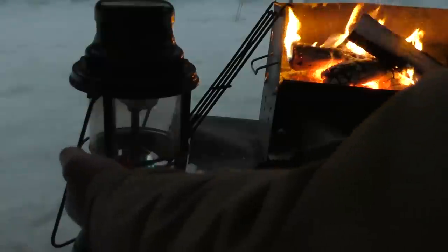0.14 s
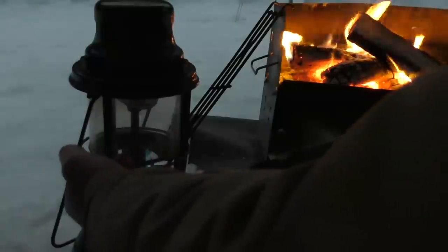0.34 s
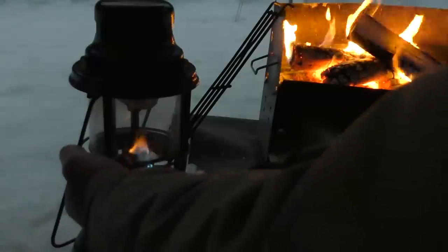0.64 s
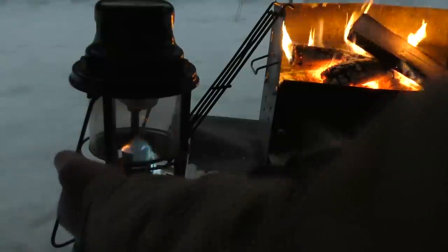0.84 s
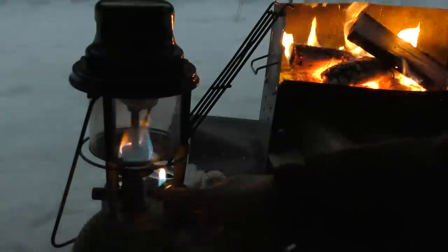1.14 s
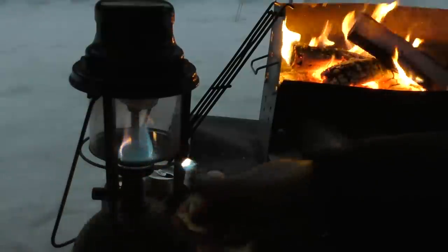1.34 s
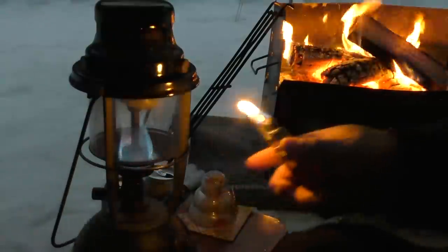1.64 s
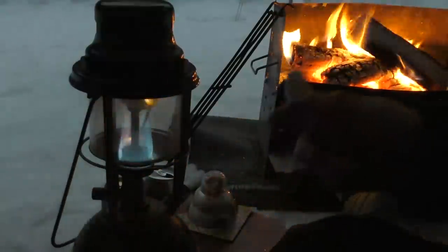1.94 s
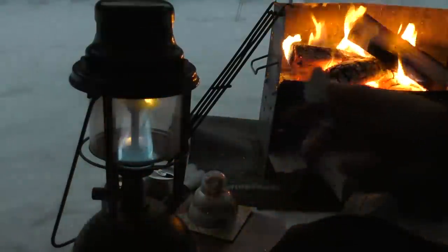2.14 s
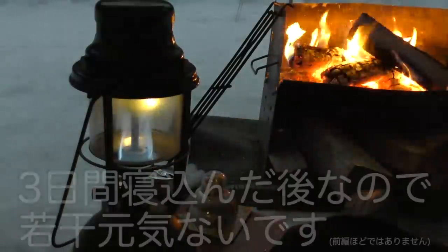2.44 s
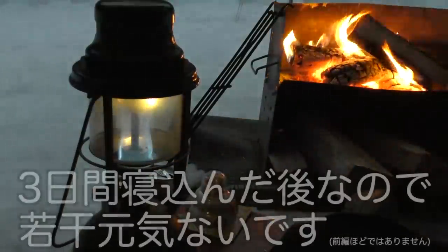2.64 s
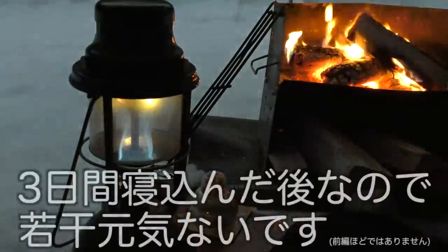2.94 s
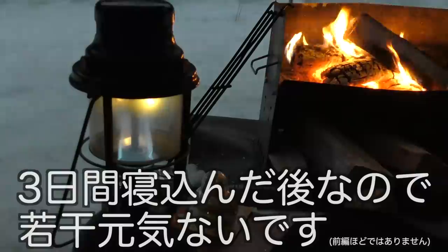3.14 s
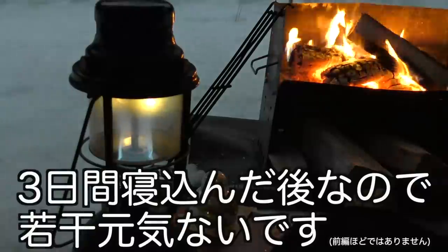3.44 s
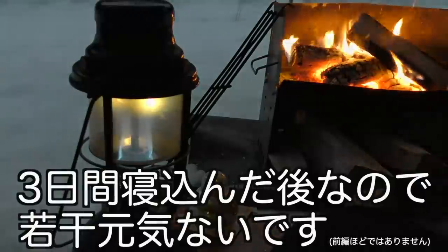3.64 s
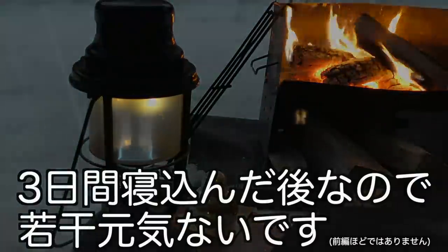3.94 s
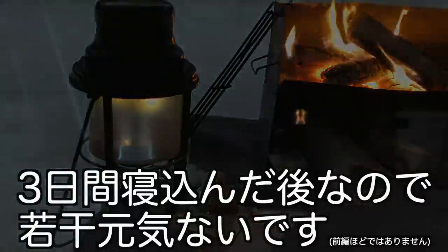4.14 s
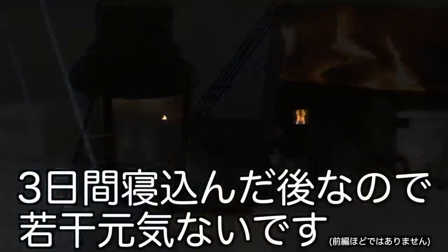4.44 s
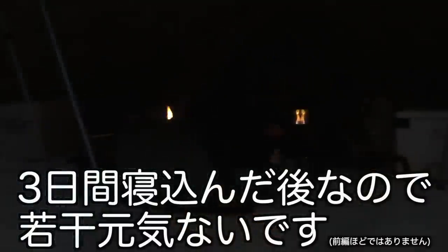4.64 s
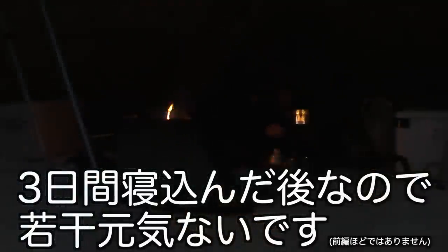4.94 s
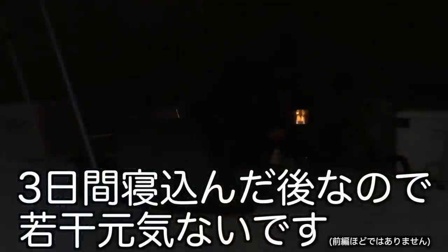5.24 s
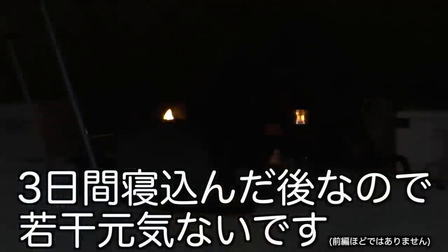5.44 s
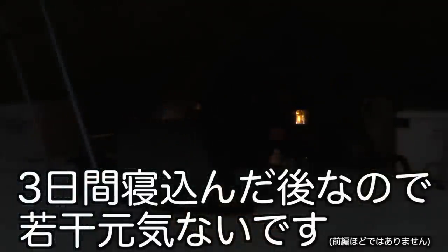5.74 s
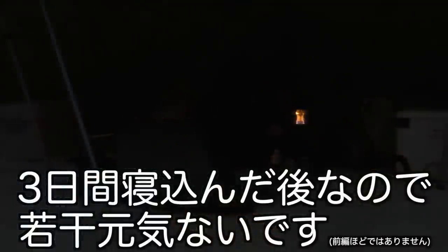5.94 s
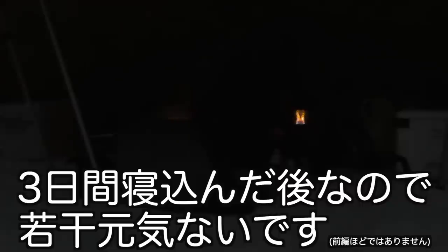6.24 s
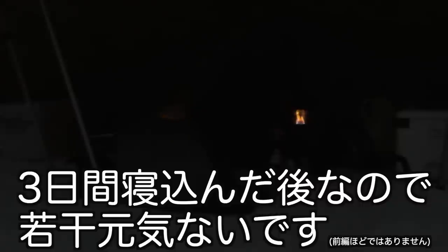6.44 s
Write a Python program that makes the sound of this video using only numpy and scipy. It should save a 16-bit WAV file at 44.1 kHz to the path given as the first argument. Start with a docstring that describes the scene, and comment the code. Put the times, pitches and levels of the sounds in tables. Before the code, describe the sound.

Close stereo pickup in open air, with a wide, faint outdoor hiss throughout. From the start a wood fire gives scattered bright ticks and soft low thumps. At about 0.8 s a gas torch begins, a turbulent hiss growing louder and brighter for a second. Around 1.86 s its trigger releases with a small click, then snaps at 1.88 s, extremely loud and sharp, with a brief metallic ring; the background ducks and slowly recovers. From 2.3 to 4 s sleeves rustle in soft swishes, with fire ticks, thumps, a faint scrape and a light metal tap near 3.5 s. Small knocks precede six pump strokes at about 4.2, 4.67, 5.11, 5.54, 5.98 and 6.42 s: rapid low gulps, wet spits, rasping friction, dull stop and clatter, strongest on the fifth. Softer return slides and thin rod pings fall between, the brightest at 5.7 s.

```python
"""Pressure lantern at a campsite

Dusk, close stereo microphone: a gas torch, a turbulent hiss, lights a pressure lantern and snaps shut.
Sleeves rustle as slipping fibres; a wood fire ticks with short pitched bursts and thumps softly.
Then six pump strokes: air gulps through the check valve into the tank, the plunger rasps and knocks in
its barrel over ringing metal modes, and the loose rod pings. A faint outdoor hiss lies under it all."""
import sys
import numpy as np
from scipy import signal
from scipy.fft import rfft, irfft
from scipy.io import wavfile
from scipy.ndimage import uniform_filter1d, map_coordinates

SR = 44100
rng = np.random.default_rng(int(sys.argv[2]) if len(sys.argv) > 2 else 0)


def bounce(signal):
    """Save signal as a 16-bit WAV file at the path given by the first command-line argument."""
    frames = np.transpose(np.atleast_2d(signal))
    limited = np.clip(frames, -1, 1)
    pcm = np.round(limited * 32767).astype(np.int16)
    wavfile.write(sys.argv[1], SR, pcm)


N = 290619
TIME = np.arange(N) / SR
RING = TIME[:SR // 4]  # time axis of one short sound

# All levels below are nominal: trims inside the functions and the limiter still follow.
# outdoor hiss: (frequency [Hz], gain [dB])
OUTDOORS_SPECTRUM = [(15, -49), (25, -12), (195, 0.5), (326, -3), (476, -7), (575, -16.5), (695, -8),
                     (775, -10), (936, -4), (1890, -3.5), (2910, -7), (6050, -21), (12200, -18),
                     (14800, -18.5), (16000, -25)]
AIR_DB, AIR_DRIFT_DB_PER_S = -47, -0.3563  # the drift also applies to the flames

# ticks of the embers: (time [s], level [dB], pitch [Hz], ring relative to tick [dB])
EMBERS = [(0.1698, -27, 13000, -6), (0.2995, -41, 8250, -10), (0.3397, -30, 8700, -3),
          (0.5715, -26.5, 8240, -3.5), (1.417, -24, 12000, -2), (2.3145, -43, 10200, -5),
          (2.7256, -32, 8500, -3), (3.009, -36.5, 9000, -5), (3.572, -34.5, 11100, -2),
          (3.6363, -32, 13800, -10), (4.0155, -26, 7000, -23)]
# soft low thumps, like flaps of the fire: (time [s], level [dB], starting pitch [Hz])
THUMPS = [(0.025, -47, 170), (0.264, -50, 145), (0.522, -44, 170), (0.7, -38, 336), (0.729, -36, 153),
          (2.219, -39.5, 168), (2.38, -38, 234), (2.537, -41.5, 242), (2.651, -38, 226), (2.852, -41, 223),
          (3.364, -39, 300), (3.66, -40, 244)]

# soft swishes of a sleeve, and one brief fizz near the start:
# (time of peak [s], rise [s], level [dB], treble [dB])
SWISHES = [(0.325, .03, -53, 3), (2.36, 0.21, -56, 3), (2.6, 0.068, -57.5, 6), (2.73, 0.066, -48.5, 8),
           (2.825, 0.045, -49.5, 9.5), (2.94, 0.2, -51.5, -5), (3.384, 0.076, -46.5, -1),
           (3.55, .1, -51, -8), (3.67, 0.069, -47.5, 0.5), (3.783, 0.067, -45.5, -3),
           (3.95, 0.17, -56, 0.5)]
SWISH_FALL_SHARE = 0.94  # fall time over rise time
# rustling cloth: (frequency [Hz], gain [dB])
CLOTH_SPECTRUM = [(59, -24), (100, -6.5), (315, -0.5), (524, -3.5), (583, -14), (801, -13), (1360, -2.5),
                  (1650, -6), (4570, -14.5), (6990, -19), (11200, -13.5), (14400, -18), (16000, -29)]
# a faint hollow scrape: (time of peak [s], rise [s], fall [s], level [dB], pitch [Hz])
SCRAPE = (2.9, .05, .08, -49, 1330)
# a light tap on metal: (time [s], level [dB], ring [Hz], t60 [s])
TAP = (3.478, -29, 4330, .06)

TORCH_ON_S, TORCH_OFF_S, TORCH_ATTACK_S, TORCH_RELEASE_S = 0.83, 1.836, 0.16, 0.16
TORCH_DB, TORCH_SWELL_DB_PER_S = -39.5, 11
TORCH_TREBLE_DB, TORCH_TREBLE_DB_PER_S = -9, 7.5
# gas jet: (frequency [Hz], gain [dB])
JET_SPECTRUM = [(59, -43), (100, -14.5), (244, -3), (289, -0.5), (461, -2.5), (595, -8.5), (648, -10),
                (836, -11.5), (1130, -3), (1680, -2.5), (2420, -4.5), (3700, -5), (6840, -11.5),
                (11900, -5), (16000, -16)]
# torch trigger lets go and snaps home: (time [s], level [dB], treble [dB], strongest ring [Hz], its t60 [s])
SNAPS = [(1.858, -24.5, -17, 2720, 0.049), (1.8796, 6.5, 7, 9900, 0.018), (1.8826, 2, -10, 2750, 0.0058)]
# crack of the trigger: (frequency [Hz], gain [dB])
TRIGGER_SPECTRUM = [(350, -54), (600, -39), (1410, -14.5), (1700, -10.5), (1960, -5.5), (2830, -12),
                    (3210, -11), (4340, -5), (4780, -12), (7110, -15), (10200, 0), (16000, -12)]
# torch body, before its overall damping: (frequency [Hz], level [dB], t60 [s])
TORCH_MODES = [(1670, 1, 0.033), (2600, -4, 0.0087), (4380, -14.5, 0.076), (6550, -8, 0.051),
               (9510, -2.5, 0.09), (12300, -8, 0.051), (14200, -10, 0.057)]

# lantern metal, before a random spread of levels: (frequency [Hz], level [dB], t60 [s])
LANTERN_MODES = [(988, -6.5, 0.036), (1333, -7.5, 0.038), (2240, -11.5, 0.18), (2920, -7, 0.14),
                 (3342, 5.5, 0.048), (4210, -2.5, 0.055), (4660, -0.5, 0.066), (4620, -24, 0.037),
                 (5440, -3, 0.064), (5910, -8.5, 0.14), (9000, -3, 0.072), (11080, 1, 0.023),
                 (10400, 0, 0.065)]
# dense ringing of the pump barrel: (frequency [Hz], gain [dB])
BARREL_SPECTRUM = [(410, -46.5), (700, -2.5), (808, -15), (958, 0.5), (1230, -5), (1330, -3), (1800, -6.5),
                   (1940, 0.5), (2660, -1.5), (3280, -3.5), (3600, -7), (4800, -7), (6650, -12),
                   (10800, -9), (16000, -21)]
# rod bumps sideways against the barrel as it is gripped and pushed: (time [s], level [dB], treble [dB])
KNOCKS = [(3.785, -32, 2), (3.812, -32.5, 2), (4.188, -33.5, 1), (4.22, -22.5, 12), (5.077, -32.5, -6),
          (5.125, -24, 1), (5.986, -20.5, 2), (6.434, -28, 0)]
KNOCK_CONTACT_S, KNOCK_HZ = 0.0048, 3300
# before each push the rod takes up its slack with a light knock and a ping: (time [s], level [dB])
SLACK = [(4.148, -39), (4.609, -43.5), (5.054, -35.5), (5.472, -32), (5.935, -29), (6.366, -32.5)]
SLACK_CONTACT_S, SLACK_HZ, SLACK_TREBLE_DB, SLACK_PING_DB = 0.0047, 3080, -4.5, -1
# plunger hits bottom dully, then clatters and rebounds:
# (time [s], knock level [dB], clatter delay [s], clatter level [dB], treble [dB])
STOPS = [(4.264, -14.5, 0.025, -24.5, 0.5), (4.696, -25, .012, -31, 3), (5.142, -39, .012, -21.5, 4),
         (5.594, -28, 0.025, -23.5, 9), (6.018, -12, .015, -10, 4), (6.465, -20, .012, -18.5, 0.5)]
STOP_CONTACT_S, STOP_HZ, STOP_TREBLE_DB = 0.0038, 1800, -3.5
CLATTER_CONTACT_S, CLATTER_HZ = 0.0084, 4220
REBOUND_S, REBOUND_DB = 0.046, -18
# how much the strongest ring stands out
STOP_FOCUS_DB, CLATTER_FOCUS_DB, LIGHT_FOCUS_DB = -2, -5, -8.5

# rod pings as it is drawn back: (time [s], level [dB])
PINGS = [(4.831, -41), (5.2614, -27.5), (5.7027, -14), (6.131, -30.5), (6.5824, -30.5)]
# loose rod, before its overall damping: (frequency [Hz], level [dB], t60 [s])
ROD_MODES = [(3260, -35, 0.071), (4260, -7, 0.062), (5230, -52, 0.086), (5820, -2.5, 0.046),
             (6589, -37, 0.076), (8046, 6, 0.062), (12310, -21, 0.072), (14320, -36, 0.095)]

# pump strokes: (time [s], length [s], valve openings [per s], gulp level [dB], gulp pitch [ratio],
# rasp level [dB], rasp fade [s], rasp treble [dB])
STROKES = [(4.203, 0.068, 74, -22.5, 1.09, -23, 0.033, -16),
           (4.673, 0.049, 71, -18, 1.03, -19.5, 0.024, -7.5),
           (5.112, 0.059, 82.5, -16.5, 1.06, -23, 0.046, -2.5),
           (5.537, 0.063, 87.4, -18, 1, -24.5, 0.041, -28), (5.981, 0.04, 105, -19.5, 0.84, -21, 0.038, 2),
           (6.424, 0.054, 104, -23, 0.91, -23, 0.025, -9)]
# after each push the plunger slides back, fastest RETURN_S after the stroke began
RETURN_S, RETURN_RISE_S, RETURN_FALL_S, RETURN_DB = 0.29, 0.12, 0.026, -52.5
RETURN_GLIDE = 0.11  # how strongly plunger speed shifts the pitch of the hiss
# hiss of the plunger sliding back: (frequency [Hz], gain [dB])
SLIDE_SPECTRUM = [(2060, -39), (3500, -4), (4310, 4), (4570, -32), (5570, -7), (6040, -6.5), (8260, 5),
                  (9770, -10), (14000, -26)]
# tank resonance: (frequency [Hz], gain [dB])
TANK_SPECTRUM = [(29, -78), (50, -31.5), (165, 2.5), (282, 7.5), (469, 2.5), (539, -6), (620, -42),
                 (721, -9.5), (800, -33), (1040, -29), (1760, -120)]

LIMIT_DB, RECOVER_DB_PER_S = -7.5, 30.5  # the recorder's limiter
TOP_HZ = 16100  # the recorder's upper limit


def undb(db):
    """Decibels to gain."""
    return 10 ** (np.asarray(db) / 20)


def unit(x):
    """Scale to rms 1."""
    return x / np.sqrt(np.mean(x ** 2) + 1e-20)


def crest(x):
    """Scale so that the loudest 2 ms have rms 1."""
    return x / np.sqrt(uniform_filter1d(x ** 2, size=88).max() + 1e-20)


def add(track, s, x):
    """Mix a sound into a track at time s."""
    i = max(int(s * SR), 0)
    track[i:i + len(x)] += x[:max(N - i, 0)]


def colour(x, spectrum):
    """Causal minimum-phase filter with the given (Hz, dB) outline."""
    size = 4096
    hz, db = np.transpose(spectrum)
    bins_hz = np.arange(size // 2 + 1) * SR / size
    gain = undb(np.interp(np.log(bins_hz + 1), np.log(hz), db))
    # folding the cepstrum onto positive times makes the filter causal
    cepstrum = irfft(np.log(gain))
    cepstrum[1:size // 2] *= 2
    cepstrum[size // 2 + 1:] = 0
    response = irfft(np.exp(rfft(cepstrum)))
    return signal.fftconvolve(x, response)[:len(x)]


def band(x, lo_hz, hi_hz):
    """Band-pass with second-order skirts."""
    edges_hz = [lo_hz, min(hi_hz, SR / 2 - 1)]
    return signal.sosfilt(signal.butter(2, edges_hz, "band", fs=SR, output="sos"), x)


def brighten(x, db, corner_hz=7500):
    """Raise or lower the treble."""
    low = signal.sosfiltfilt(signal.butter(2, corner_hz, fs=SR, output="sos"), x)
    return low + undb(db) * (x - low)


def fade(t60):
    """Exponential decay by 60 dB in t60 seconds."""
    return np.exp(-np.log(1000) * RING / t60)


def burst(t60):
    """Dying noise: many modes too close to tell apart."""
    return rng.standard_normal(len(RING)) * fade(t60)


def ring(modes):
    """Free vibration of a struck body: decaying sines of random polarity."""
    total = np.zeros(len(RING))
    for hz, db, t60 in modes:
        cycles = hz * RING + rng.integers(2) / 2
        total += undb(db) * fade(t60) * np.sin(2 * np.pi * cycles)
    return unit(total)


def wander(rate):
    """Random wander of rms 1, from smoothed steps drawn about rate times a second."""
    k = int(SR / rate)
    steps = np.repeat(rng.standard_normal(N // k + 1), k)
    return unit(uniform_filter1d(uniform_filter1d(steps, k), k)[:N])


def grains(per_s, spread_db):
    """Tiny slips at random times and of random size."""
    size = undb(spread_db * np.minimum(rng.exponential(size=N), 4))
    happens = rng.random(N) < per_s / SR
    return unit(happens * size * rng.choice([-1, 1], N))


def swell(s, rise_s, fall_s):
    """Smooth rise and fall of one movement, 1 at time s."""
    distance = (TIME - s) / np.where(TIME < s, rise_s, fall_s)
    return np.exp(-np.minimum(distance ** 2, 20))


def place(x, pan_db, side_db, t60=0.041):
    """Put a source before the stereo microphone; things nearby scatter a little of it sideways."""
    scatter = burst(t60)
    side = undb(side_db) * signal.fftconvolve(x, scatter / np.linalg.norm(scatter))[:N]
    # pan_db is the level of the first channel over the second
    return np.array([(x + side) * undb(pan_db / 2), (x - side) * undb(-pan_db / 2)])


def outdoors():
    """A wide, even hiss of filtered noise whose level wavers a little."""
    mid, side = (unit(colour(rng.standard_normal(N), OUTDOORS_SPECTRUM)) * undb(.5 * wander(11))
                 for _ in range(2))
    side = undb(-8.5) * brighten(side, 1.3, corner_hz=4000)
    return undb(AIR_DB + AIR_DRIFT_DB_PER_S * TIME) * np.array([mid + side, mid - side])


def fire(tick_db=-3, flutter_db=-61):
    """Gas pockets burst in the logs: sharp ticks with a brief pitch; flames flap in low puffs and thumps."""
    ticks = np.zeros(N)
    for s, db, hz, ring_db in EMBERS:
        tick = crest(band(burst(0.011) + undb(-9) * burst(0.066), hz / 2.4, 17000))
        tone = crest(band(burst(0.016), hz / 1.024, hz * 1.026))
        add(ticks, s, undb(db + tick_db) * crest(tick + undb(ring_db) * tone))

    puffs = grains(300, 2) * undb(3 * wander(14))
    low_puffs = unit(band(band(puffs, 71, 380), 71, 380))  # twice, for steeper skirts
    flutter = undb(flutter_db + AIR_DRIFT_DB_PER_S * TIME) * low_puffs

    thumps = np.zeros(N)
    for s, db, pitch_hz in THUMPS:
        # a few cycles that sink in pitch
        hz = pitch_hz * (.5 + .5 * fade(0.099))
        cycles = np.cumsum(hz) / SR
        add(thumps, s, undb(db) * crest(RING * fade(0.019) * np.sin(2 * np.pi * cycles)))
    flames = place(flutter, -0.44, -5.5) + place(thumps, -.5, -19)
    return place(ticks, -0.89, -17, t60=0.013) + flames


def handling(cloth_db=5.5, treble_db=-1, crinkle_db=-3):
    """Cloth fibres slip and crinkle in swishes and a brief fizz; hands scrape the gear and tap a metal part."""
    fibres = unit(colour(grains(5000, 1.6), CLOTH_SPECTRUM)) * undb(cloth_db + 2 * wander(35))
    crinkles = signal.oaconvolve(grains(260, 5.4), burst(0.019))[:N]
    fibres += undb(crinkle_db) * unit(band(crinkles, 1760, 4200))
    cloth = np.zeros(N)
    for s, rise_s, db, bright_db in SWISHES:
        movement = undb(db) * swell(s, rise_s, SWISH_FALL_SHARE * rise_s)
        cloth += movement * brighten(fibres, bright_db + treble_db)

    s, rise_s, fall_s, db, hz = SCRAPE
    scrape = undb(db) * swell(s, rise_s, fall_s) * unit(band(grains(1100, 4.7), hz / 1.2, hz * 1.05))

    tap = np.zeros(N)
    s, db, hz, t60 = TAP
    contact = crest(band(burst(0.015), 1100, 3000))
    add(tap, s, undb(db) * crest(crest(ring([(hz, 0, t60)])) + undb(7) * contact))
    return place(cloth + scrape, -2.8, -10) + place(tap, -.5, -19)


def torch(flicker_db=1.5):
    """A turbulent gas jet grows louder and brighter until the sprung trigger snaps shut."""
    burning_s = np.clip(TIME, TORCH_ON_S, TORCH_OFF_S) - TORCH_ON_S
    opening, closing = burning_s / TORCH_ATTACK_S, (TORCH_OFF_S - TIME) / TORCH_RELEASE_S
    flow = np.clip(np.minimum(opening, closing), 0, 1)
    jet_db = TORCH_DB + TORCH_SWELL_DB_PER_S * burning_s + flicker_db * wander(44.88)
    jet = unit(colour(grains(9000, 1.6), JET_SPECTRUM)) * undb(jet_db)
    jet = flow * brighten(jet, TORCH_TREBLE_DB + TORCH_TREBLE_DB_PER_S * burning_s, corner_hz=8500)

    snaps = np.zeros(N)
    for s, db, bright_db, hz, t60 in SNAPS:
        crack = unit(colour(burst(0.036) + undb(-14.0) * burst(0.094), TRIGGER_SPECTRUM))
        crack += undb(-7) * unit(ring(TORCH_MODES) * fade(0.11))
        spring = unit(band(burst(t60), hz / 1.06, hz * 1.06))
        add(snaps, s, undb(db) * crest(unit(brighten(crack, bright_db)) + undb(-5.5) * spring))
    return place(jet, -1.2, -11) + place(snaps, -1, -12.5, t60=0.0071)


def metal(modes_db=-6, t60=0.06, spot_db=3):
    """Response of the lantern to one tick; its mode levels differ with the spot that is touched."""
    click = unit(1. * (RING == 0))
    dense = unit(colour(unit(burst(t60)) + undb(0.5) * click, BARREL_SPECTRUM))
    modes = np.array(LANTERN_MODES, float)
    modes[:, 1] += spot_db * rng.standard_normal(len(modes))
    body = dense + undb(modes_db) * ring(modes)
    return body / np.linalg.norm(body)


def knock(db, contact_s, hz, treble_db, focus_db, lowest_hz=1050):
    """A brief chatter of contacts swells and dies, ringing the metal with emphasis near one pitch."""
    chatter = rng.standard_normal(len(RING)) * np.sqrt(RING) * np.exp(-RING / contact_s)
    clank = band(signal.fftconvolve(chatter, metal())[:len(RING)], lowest_hz, 17000)
    focus = unit(band(clank, hz / 1.45, hz * 1.28))
    return undb(db) * crest(unit(brighten(clank, treble_db)) + undb(focus_db) * focus)


def pump_knocks():
    """The rod takes up its slack, bumps the barrel on the way and drives the plunger against its stop."""
    out = np.zeros(N)
    for s, db in SLACK:
        add(out, s, knock(db, SLACK_CONTACT_S, SLACK_HZ, SLACK_TREBLE_DB, LIGHT_FOCUS_DB))
    for s, db, treble_db in KNOCKS:
        add(out, s, knock(db, KNOCK_CONTACT_S, KNOCK_HZ, treble_db, LIGHT_FOCUS_DB))
    for s, db, delay_s, clatter_db, treble_db in STOPS:
        add(out, s, knock(db, STOP_CONTACT_S, STOP_HZ, treble_db + STOP_TREBLE_DB, STOP_FOCUS_DB))
        for late_s, drop_db in ((0, 0), (REBOUND_S, REBOUND_DB)):
            clatter = knock(clatter_db + drop_db, CLATTER_CONTACT_S, CLATTER_HZ, treble_db, CLATTER_FOCUS_DB)
            add(out, s + delay_s + late_s, clatter)
    return place(out, -1.2, -19.5)


def rod(ping_db=-3, rattle_db=-11, tick_db=-2, bounce_s=.0045):
    """The loose rod rings briefly in its modes and rattles once in its cap."""
    out = np.zeros(N)
    slack_pings = [(s, db + SLACK_PING_DB) for s, db in SLACK]
    for s, db in PINGS + slack_pings:
        ping = crest(ring(ROD_MODES) * fade(0.45))
        tick = undb(tick_db) * crest(band(burst(0.0049), 8100, 8300))
        # the contact takes a moment to build, which keeps the attack round
        attack = np.minimum(RING / 0.00032, 1)
        add(out, s, undb(db + ping_db) * crest((ping + tick) * attack))
        add(out, s + bounce_s, undb(db + rattle_db) * crest(band(burst(0.027), 1600, 10640)))
    return place(out, -0.56, -19)


def plunger(rise_s=0.026, swell_db=5, shake_db=-6, stutter_db=4.0):
    """The leather cup rasps down the barrel, ringing the lantern's metal, and slides softly back."""
    rasp, push, pull = np.zeros(N), np.zeros(N), np.zeros(N)
    slips = grains(2200, 3.8) * undb(stutter_db * wander(170))
    for s, length, _, _, _, db, fade_s, treble_db in STROKES:
        # friction grows with the pressure, then dies away as the hand stops
        pressure = np.clip((TIME - s) / length, 0, 1)
        outside = np.maximum(s - TIME, 0) / rise_s + np.maximum(TIME - s - length, 0) / fade_s
        force_db = db + swell_db * (pressure - 1.5) - 8.2 * (TIME < s)
        force = undb(force_db) * np.exp(-np.minimum(outside, 20))
        rasp += signal.oaconvolve(force * slips, brighten(metal(), treble_db))[:N]
        push += force
        pull += swell(s + RETURN_S, RETURN_RISE_S, RETURN_FALL_S)
    # the push also shakes the tank
    shake = undb(shake_db) * push * unit(band(colour(grains(900, 5), TANK_SPECTRUM), 112, 1300))
    # the hiss of the return rises in pitch with the speed
    travel = np.cumsum(1 + RETURN_GLIDE * (pull - .8))
    slide = unit(map_coordinates(colour(grains(4000, 3.6), SLIDE_SPECTRUM), [travel], mode="mirror"))
    slide *= pull * undb(RETURN_DB + 2 * wander(40))
    return place(rasp + slide, -0.31, -18) + place(shake, -.4, -21)


def add_gulp(track, s, db, pitch):
    """One gulp of air into the tank; a smaller bubble sounds higher."""
    shape = colour(1. * (RING == 0), TANK_SPECTRUM)
    add(track, s, undb(db) * crest(np.interp(RING * pitch, RING, shape)))


def valve(echo_s=0.00605, echo_db=-10, spit_db=-12, spit_t60=0.075, squeak_db=-15, squeak_hz=9300, sag_db=3):
    """Air enters the tank in quick gulps, each with a rebound, a wet spit and a tiny squeak of the valve."""
    gulps, spits = np.zeros(N), np.zeros(N)
    for s, length, rate, db, tone, *_ in STROKES:
        chances = rng.standard_normal((int(length * rate) + 1, 4))
        for k, (late, size, pitch, rebound) in enumerate(chances):
            at = s + (k + .04 * late) / rate
            gulp_db = db + size - sag_db * (k / rate / length - .5)
            add_gulp(gulps, at, gulp_db, tone * (1 + .07 * pitch))
            echo_at = at + echo_s * (1 + 0.22 * rebound)
            add_gulp(gulps, echo_at, gulp_db + echo_db, tone * (1.107 + 0.15 * rebound))
            spit = band(burst(spit_t60), 890, 3500)
            add(spits, at, undb(gulp_db + spit_db + 2 * rebound) * crest(spit))
            squeak = band(burst(0.037), squeak_hz / 1.07, squeak_hz * 1.03)
            add(spits, at, undb(gulp_db + squeak_db + 3 * pitch) * crest(squeak))
    return place(gulps, -0.51, -29) + place(spits, -0.75, -36)


def limiter(x):
    """The gain drops at once under a loud peak and creeps back, so the background sinks after the snap."""
    power = uniform_filter1d(np.mean(x ** 2, axis=0), size=88)
    over_db = np.maximum(10 * np.log10(np.maximum(power, 1e-12)) - LIMIT_DB, 0)
    recovered_db = RECOVER_DB_PER_S * TIME
    return x * undb(recovered_db - np.maximum.accumulate(over_db + recovered_db))


def scene():
    """All sources around the lantern."""
    return outdoors() + fire() + handling() + torch() + pump_knocks() + rod() + plunger() + valve()


def record(dry):
    """The recorder limits loud peaks, clips at full scale and cuts the top."""
    clipped = np.clip(limiter(dry), -1, 1)
    return signal.sosfilt(signal.ellip(10, .2, 80, TOP_HZ, fs=SR, output="sos"), clipped)


dry = scene()
out = record(dry)
bounce(out)
```